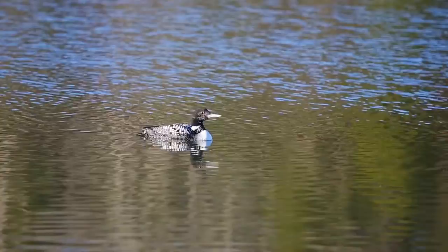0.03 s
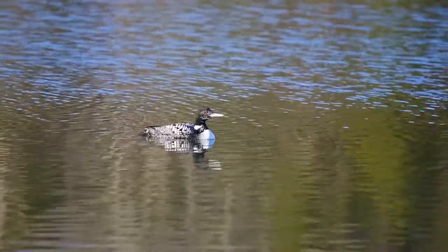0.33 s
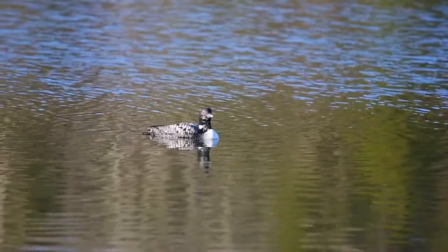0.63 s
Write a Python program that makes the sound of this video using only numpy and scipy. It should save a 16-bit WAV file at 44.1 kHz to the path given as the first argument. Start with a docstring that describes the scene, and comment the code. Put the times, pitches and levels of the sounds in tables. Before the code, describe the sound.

Far songbirds whistling softly across a lake, with fluttering wind and distant traffic hum.

```python
"""A quiet lake shore. A far songbird slurs whistles upward, a second answers with arched ones, a third
starts thin high notes, and low calls cross the water: gliding tones, reflected by shore and woods.
Light wind flutters on the camera and excites the resonances of its hollow body, which ticks once
as it is handled. Far away the harmonics of an engine rise as it gathers speed, then fade,
among the drones of other traffic and under a steady hiss."""
import sys
import numpy as np
from scipy import signal
from scipy.fft import rfft, irfft
from scipy.io import wavfile
from scipy.ndimage import uniform_filter1d

SR = 44100
rng = np.random.default_rng(int(sys.argv[2]) if len(sys.argv) > 2 else 0)


def master(y):
    """Save y as 16-bit WAV."""
    cut = np.clip(np.atleast_2d(y).T, -1, 1)
    pcm = np.round(cut * 32767)  # scale
    wavfile.write(sys.argv[1], SR, pcm.astype(np.int16))


N = 176400


def undb(db):
    """Amplitude ratio of a level in decibels."""
    return 10 ** (np.asarray(db) / 20)


def unit(x):
    """Normalisation to rms 1."""
    return x / np.sqrt(np.mean(x ** 2))


def walk(rate):
    """Random modulation of rms 1: values held for 1 / rate seconds, then smoothed."""
    hold = max(int(SR / rate), 2)
    steps = np.repeat(rng.standard_normal(N // hold + 1), hold)
    return unit(uniform_filter1d(uniform_filter1d(steps, hold), hold // 2)[:N])


def colour(points):
    """Spectral envelope: gain interpolated in log frequency from (f/Hz, level/dB) points."""
    hz, db = np.array(points, float).T
    return undb(np.interp(np.log(np.fft.rfftfreq(N, 1 / SR) + 1), np.log(hz), db))


def noise(gain):
    """Spectral shaping: white noise weighted by a gain at each frequency, scaled to rms 1."""
    return unit(irfft(rfft(rng.standard_normal(N)) * gain, N))


def tone(hz, waver=0.00303):
    """Frequency modulation: a sine of rms 1 whose pitch wavers by a small random fraction."""
    wavering_hz = hz * (1 + waver * walk(120))
    return np.sqrt(2) * np.sin(2 * np.pi * np.cumsum(wavering_hz) / SR)


def swell(u, attack, release):
    """Amplitude envelope over u = 0 to 1; attack and release are fractions of that span."""
    return np.sin(np.pi / 2 * np.clip(np.minimum(u / attack, (1 - u) / release), 0, 1))


def bump(t, middle, length):
    """Gaussian pulse whose full width at half height is the given length."""
    return 2 ** -np.minimum((2 * (t - middle) / length) ** 2, 100)


def glides(t, notes, attack, release):
    """Linear sweeps: each tone slides straight from one frequency to another."""
    out = np.zeros(N)
    for start, length, from_hz, to_hz, db in notes:
        u = (t - start) / length
        out += undb(db) * tone(np.interp(u, [0, 1], [from_hz, to_hz])) * swell(u, attack, release)
    return out


def hiss():
    """Stationary broadband noise: the rumble of distant traffic and a steady hiss."""
    # noise spectrum (f/Hz, relative spectral level/dB)
    spectrum = [(20, -44), (45, -6.5), (75, -2), (150, -5), (280, -5.5), (500, -5), (900, -16.5),
                (1800, -21.5), (2900, -23.5), (3350, -20.5), (3900, -23.5), (7000, -26), (11000, -28.5),
                (16000, -33.5)]
    return undb(-52) * noise(colour(spectrum))


def traffic(t):
    """Engine harmonics follow the cycle rate amid steadier drones; the air makes them fade in and out."""
    # run of the far engine (t/s, cycle rate/Hz, level/dB)
    run = [(0, 12, -65), (0.501, 13.2, -56), (1.001, 15.4, -57.5), (1.5, 17.7, -52.5), (2., 18.6, -54.5),
           (2.3, 19.7, -55.5), (2.6, 24, -80), (4., 23, -81)]
    # its harmonics (multiple of the cycle rate, relative level/dB)
    orders = [(4, -12.5), (10, -5), (11, -4), (12, -8), (13, -19), (14, -0.5)]
    # drones of other traffic (onset t/s, duration/s, initial f/Hz, final f/Hz, level/dB)
    drone_notes = [(-.5, 3.8, 124.5, 124.6, -62), (0.898, 2.5, 155, 163, -57.5),
                   (2.905, 1.6, 190.5, 189, -58), (3.1, 0.89, 163.7, 166, -62.5)]
    when, cycle_hz, level_db = np.array(run).T
    hz = np.interp(t, when, cycle_hz)
    harmonics = sum(undb(db + 2.7 * walk(3.86)) * tone(round(k) * hz) for k, db in orders)
    engine = unit(harmonics) * undb(np.interp(t, when, level_db))
    drones = glides(t, drone_notes, attack=0.2, release=0.18) * undb(0.94 * walk(6.1))
    return engine + drones


def wind(t):
    """Forced resonance: turbulence buffets the microphone and rings the hollow camera body."""
    # puffs of wind (centre t/s, duration/s, level/dB)
    puffs = [(0.128, 0.053, -39), (0.192, 0.015, -35.5), (0.224, 0.0099, -35.5), (0.38, 0.07, -42),
             (0.479, 0.01, -37.5), (0.509, 0.011, -32.5), (0.604, 0.023, -41), (0.67, 0.0099, -47),
             (0.794, 0.0094, -47), (0.822, 0.01, -47), (0.937, 0.023, -43.5), (1.067, .035, -39.5),
             (1.449, 0.022, -41), (1.507, 0.042, -42.5), (1.779, 0.028, -41), (1.818, 0.044, -44.5),
             (2.037, 0.033, -45), (2.27, .04, -42), (2.395, .02, -53), (2.483, 0.022, -39),
             (2.595, .014, -38.5), (2.621, 0.023, -40.5), (2.819, 0.015, -41), (2.88, 0.0077, -47),
             (2.936, 0.019, -45), (3.027, 0.051, -42.5), (3.133, 0.025, -41.5), (3.303, 0.012, -48),
             (3.354, 0.027, -44), (3.457, 0.029, -46), (3.518, 0.014, -54), (3.742, 0.0065, -40),
             (3.776, 0.011, -41.5), (3.872, 0.018, -48), (3.931, 0.017, -43)]
    # lulls in the breeze (centre t/s, duration/s, depth/dB)
    lulls = [(0.743, 0.14, 3.5), (.885, 0.03, 7), (1.887, 0.039, 3), (2.123, .08, 1), (2.326, .05, 7),
             (2.581, 0.017, 12), (2.703, .04, 11), (3.225, 0.077, 11)]
    # turbulence at the microphone (f/Hz, relative spectral level/dB)
    turbulence = [(40, -24.5), (120, -15.5), (270, -23), (350, -9), (470, -13), (570, -5.5), (690, -40),
                  (800, -22), (900, -26.5), (1250, -24), (1330, -31.5), (1520, -24.5), (1700, -41.5),
                  (2300, -33.5), (4500, -50.5), (16000, -65)]
    # resonances of the body (f/Hz, bandwidth/Hz, relative level/dB)
    resonances = [(629.9, 53.3, 3), (741, 48, -7.5), (558, 37, -10), (1240, 110, -26), (1400, 80, -21)]
    breeze_db, flutter_db, eddy_db = -46, 2.5, 1.12
    lull_db = sum(db * bump(t, middle, length) for middle, length, db in lulls)
    breeze = undb(breeze_db + flutter_db * walk(80) - lull_db)
    puff_power = sum(undb(db) ** 2 * bump(t, middle, length) for middle, length, db in puffs)
    force = np.sqrt(breeze ** 2 + puff_power)  # incoherent sources add in power
    f = np.fft.rfftfreq(N, 1 / SR)
    body_power = sum((undb(db) / (1 + (2 * (f - hz) / width) ** 2)) ** 2 for hz, width, db in resonances)
    buffeting = noise(np.sqrt(colour(turbulence) ** 2 + body_power))
    return force * buffeting * undb(eddy_db * walk(160))


def tick(t):
    """Damped free vibration: a hand brushes the camera and the housing's modes give one dry tick."""
    # modes of the housing (f/Hz, T60/s, relative level/dB)
    modes = [(480, 0.01, -25), (725, 0.0073, 4.5), (1290, 0.0025, 3), (2050, 0.0074, -5.5),
             (3260, 0.0032, 2.5), (5060, 0.0052, -13)]
    # friction noise of the hand (f/Hz, relative spectral level/dB)
    friction = [(300, -10), (1500, -4), (2200, -5), (2850, 1), (3300, -13), (4000, -12), (5000, -24),
                (12000, -42)]
    tick_s, rebound_s, contact_hz = 0.1539, 0.0077, 5500
    age = np.maximum(t - tick_s, 0)
    ring = np.zeros(N)
    for hz, t60, db in modes:
        decay = np.exp(-np.log(1000) * np.minimum(age / t60, 10))
        ring += undb(db) * np.sin(2 * np.pi * hz * age) * decay
    soft_contact = signal.butter(6, contact_hz, fs=SR, output="sos")  # takes off the treble
    tap = signal.sosfilt(soft_contact, ring)
    rebound = undb(-17) * np.interp(t - rebound_s, t, tap)  # the housing settles
    brush = undb(-50.5) * bump(t, middle=0.112, length=0.06) * noise(colour(friction))
    return undb(-25.5) * (tap + rebound) + brush


def scatter(x, t, t60):
    """Diffuse reverberation: countless small reflections decay by 60 dB in t60 seconds."""
    response = rng.standard_normal(SR) * np.exp(-np.log(1000) * t[:SR] / t60)
    return signal.fftconvolve(x, response / np.linalg.norm(response))[:N]


def surroundings(song, t):
    """Reflection: the direct song plus a shore echo, quick scatter off branches and a woodland tail."""
    echo_s = 0.066
    shore = undb(-14) * np.interp(t - echo_s, t, song)
    branches = undb(-13) * scatter(song, t, t60=0.08)
    woods = undb(-13) * scatter(song, t, t60=0.4)
    return song + shore + branches + woods


def whistles(t, notes, contour, attack, release):
    """Time scaling: one pitch contour is stretched to the duration of each whistle."""
    out = np.zeros(N)
    fractions, hz = np.array(contour).T
    for start, length, db in notes:
        u = (t - start) / length
        out += undb(db) * tone(np.interp(u, fractions, hz)) * swell(u, attack, release)
    return out


def birds(t):
    """Birdsong as frequency modulation: each singer sweeps one nearly pure tone."""
    # rising whistles (onset t/s, duration/s, level/dB)
    slur_notes = [(0.25, .1, -52), (0.477, 0.1, -50), (1.823, 0.076, -57), (2.035, 0.084, -57),
                  (2.256, 0.086, -57), (2.481, .078, -54.5), (2.698, 0.11, -57)]
    # their pitch, snapping back at the end (fraction of duration, f/Hz)
    slur_contour = [(0, 2390), (.25, 2470), (.48, 2616), (.68, 2766), (.75, 2797), (.8, 3046), (.86, 2685),
                    (1, 2560)]
    # arched whistles (onset t/s, duration/s, level/dB)
    arch_notes = [(0.225, .205, -57.5), (0.542, 0.21, -58), (0.884, .2, -58)]
    # their pitch (fraction of duration, f/Hz)
    arch_contour = [(0, 2667), (.2, 2615), (.5, 2657), (.7, 2646), (.85, 2494), (1, 2220)]
    # low calls from across the water (onset t/s, duration/s, level/dB)
    call_notes = [(0.184, 0.2, -62), (3.523, 0.225, -62)]
    # their pitch (fraction of duration, f/Hz)
    call_contour = [(0, 1446), (.2, 1505), (.5, 1460), (.78, 1450), (1, 1420)]
    # thin high notes (onset t/s, duration/s, initial f/Hz, final f/Hz, level/dB)
    thin_notes = [(3.765, 0.04, 5340, 5270, -58.5), (3.799, 0.063, 5280, 5274, -54.5),
                  (3.932, .02, 6080, 6020, -65), (3.954, .022, 5100, 4970, -62),
                  (3.975, .04, 4830, 4770, -59.5)]
    slurs = whistles(t, slur_notes, slur_contour, attack=0.74, release=0.47)
    arches = whistles(t, arch_notes, arch_contour, attack=0.34, release=0.23)
    calls = whistles(t, call_notes, call_contour, attack=0.18, release=0.5)
    return slurs + arches + calls + glides(t, thin_notes, attack=0.65, release=0.41)


def scene():
    """Superposition: birds, wind, tick, traffic and hiss add in one channel."""
    t = np.arange(N) / SR
    return (surroundings(birds(t), t) + wind(t) + tick(t) + traffic(t) + hiss())[None]


def record(dry):
    """Gating and band limiting: the microphone opens a moment late and cuts the highest treble."""
    open_s, fade_s, muted_db, cutoff_hz = 0.1034, 0.0034, -58.5, 15900
    opening = np.clip((np.arange(N) / SR - open_s) / fade_s, undb(muted_db), 1)
    lowpass = signal.ellip(12, 0.1, 80, cutoff_hz, fs=SR, output="sos")
    return signal.sosfilt(lowpass, dry * opening)


dry = scene()
out = record(dry)
master(out)
```